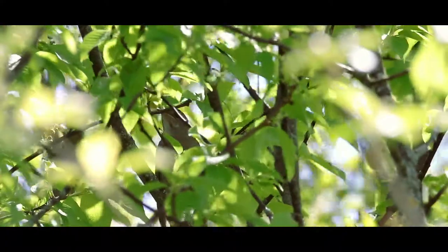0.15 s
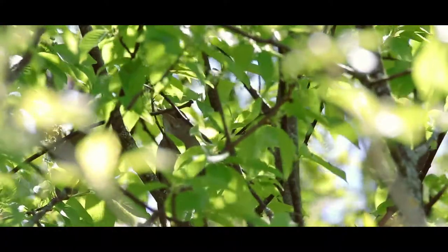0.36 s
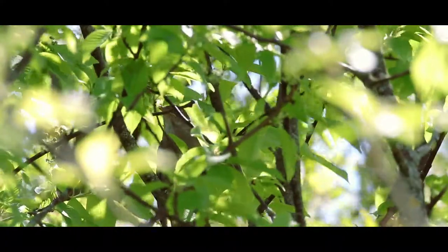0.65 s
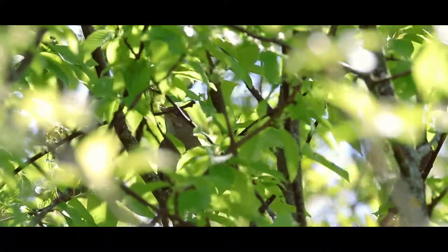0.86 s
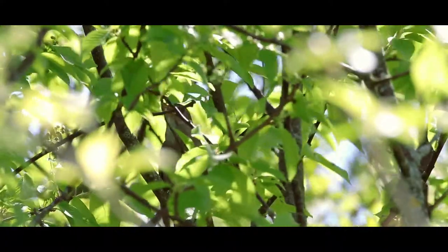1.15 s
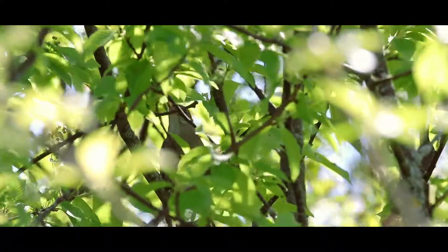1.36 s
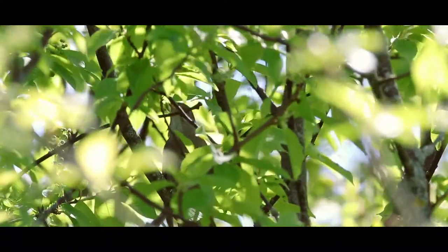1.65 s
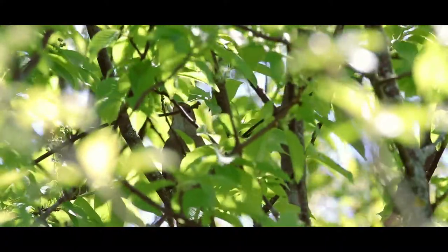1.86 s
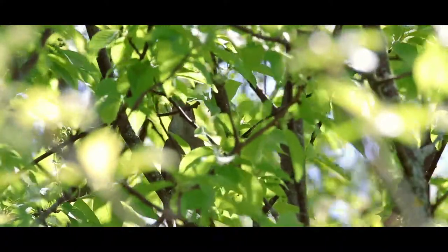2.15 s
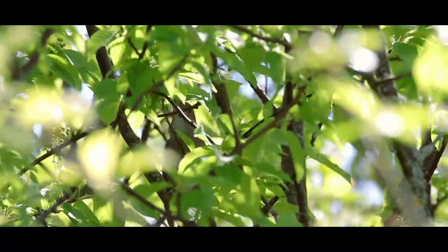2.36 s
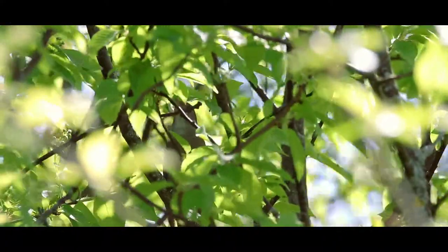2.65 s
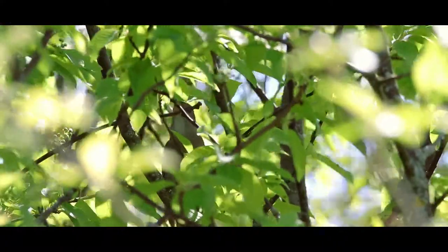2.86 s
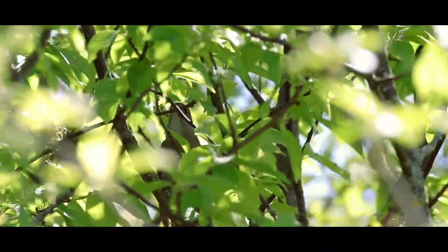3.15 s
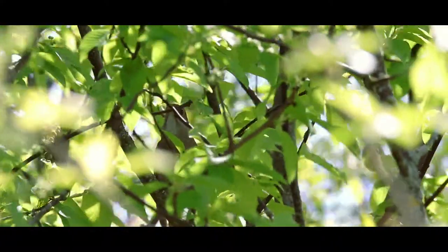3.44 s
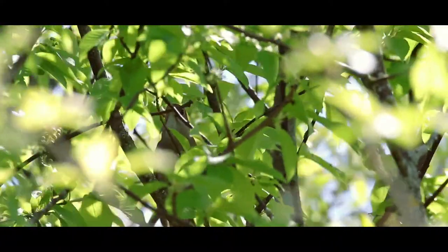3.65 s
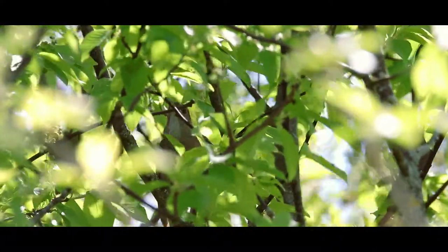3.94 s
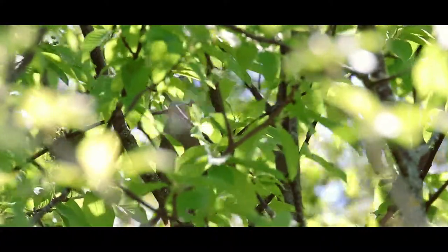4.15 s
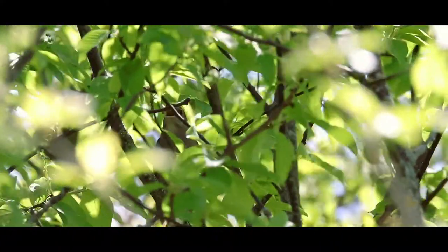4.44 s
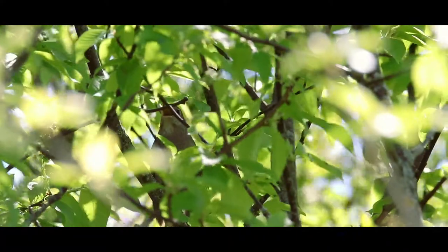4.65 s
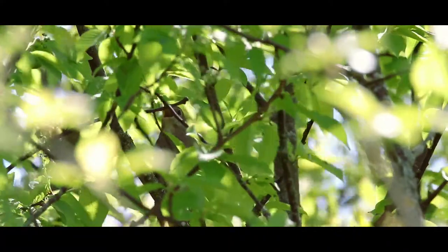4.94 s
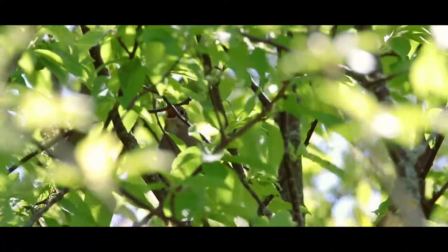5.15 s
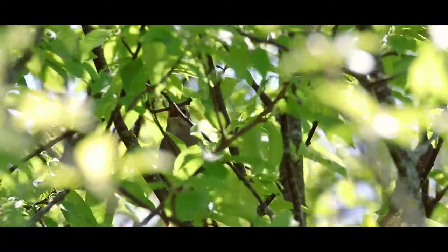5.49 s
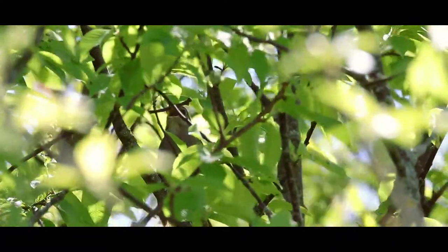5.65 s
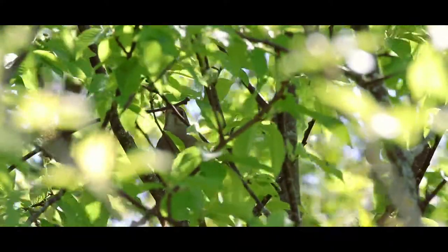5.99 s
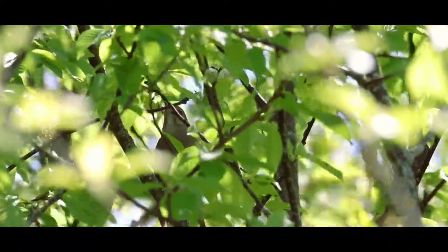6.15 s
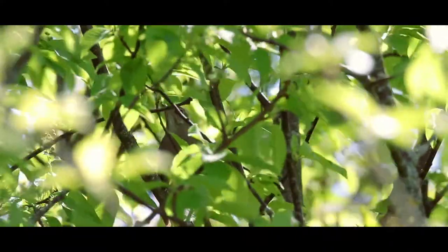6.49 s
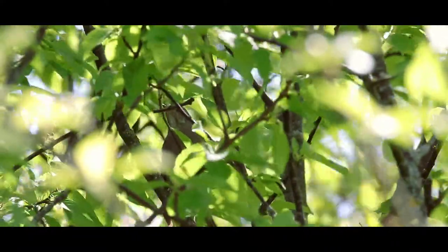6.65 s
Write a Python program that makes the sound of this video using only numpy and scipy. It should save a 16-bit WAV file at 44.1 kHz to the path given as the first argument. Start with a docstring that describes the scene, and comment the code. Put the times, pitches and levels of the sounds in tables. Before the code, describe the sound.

A thrush nightingale sings one phrase in a quiet wood: rising and falling whistles, eight loud chooks, a dry rattle and a thin tsee.

```python
"""In a wood, a thrush nightingale sings one phrase from inside a leafy tree: three whistle pairs,
a low slur, eight loud down-swept 'chooks', a rising rasp, a dry rattle, a thin 'tsee'.
Each note is a gliding syrinx tone; leaves and trunks scatter it.
Behind it: hushing air, breeze on the microphones, far leaves, a dying echo, a far bird."""
import sys
import numpy as np
from scipy import signal
from scipy.fft import rfft, irfft, next_fast_len
from scipy.io import wavfile
from scipy.ndimage import uniform_filter1d

SR = 44100
rng = np.random.default_rng(int(sys.argv[2]) if len(sys.argv) > 2 else 0)


def wav_out(sig):
    """Save sig, one row per channel (or a flat mono array), as 16-bit PCM at SR to the path in sys.argv[1]."""
    wavfile.write(sys.argv[1], SR, np.round(np.clip(np.atleast_2d(sig).T, -1, 1) * 32767).astype(np.int16))


N = 300762

# Outdoor hush: freq_hz, gain_db
AIR_SPECTRUM = [(15, -20), (30, -5.5), (55, 0), (150, -5), (330, -2.5), (450, -4.5), (650, -9), (1500, -14),
                (2300, -15), (3500, -20.5), (5200, -28), (7000, -25), (10500, -27), (15500, -34.5)]
# Left-right likeness of the hush: freq_hz, correlation (clipped to 0..0.98 in use)
AIR_CORRELATION = [(60, 0.64), (150, 0.78), (380, 0.68), (950, 0.24), (2380, -0.47), (5980, -0.00058),
                   (15000, 0.09)]
# Wind on a microphone: freq_hz, gain_db
WIND_SPECTRUM = [(15, -29), (25, -12), (40, 2.5), (60, -2), (120, -4.5), (200, -18.5), (400, -62),
                 (1500, -97)]
# Breeze puffs: centre_s, relative_db, sigma_s
WIND_PUFFS = [(2.19, -60.5, 0.0068), (3.7, -63.5, 0.1), (3.93, -51, 0.028), (4.13, -58.5, 0.05),
              (4.466, -49, 0.01), (4.52, -58, 0.033), (4.611, -47.5, 0.008)]
# Far leaves: freq_hz, gain_db
RUSTLE_SPECTRUM = [(400, -21.5), (800, -6), (1200, -2), (1650, 2.5), (2200, -1.5), (2800, -24), (4500, -35),
                   (8000, -39)]
# Far bird, arched chirps: start_s, top_hz, level_db
FAR_CHIRPS = [(.025, 4100, -74), (.33, 3850, -76), (1.25, 4900, -81), (3.329, 4180, -73), (3.5, 4430, -74),
              (4.019, 4200, -79), (5.889, 4700, -77)]
# Far bird, falling notes: start_s, from_hz, level_db
FAR_SLIDES = [(1.97, 4830, -79), (2.12, 4810, -76), (5.93, 4070, -78), (6.07, 5080, -74.5),
              (6.39, 4650, -71)]
# Foliage shading the left microphone: freq_hz, gain_db
FOLIAGE_SHADE = [(900, -1), (1400, -2.5), (2000, -4.5), (2500, -5.5), (4400, -2.5), (8000, -3), (14000, -1)]
# Echoes off near leaves: freq_hz, gain_db
LEAF_SPECTRUM = [(900, 7.5), (2300, 7), (4200, 6), (7000, 9.5), (10500, 20.5), (15000, 3)]
# Echoes off single trunks: delay_s, gain_db
TRUNK_ECHOES = [(.036, -39), (.073, -31.5), (.092, -36.5), (.141, -33)]
# Echoes off neighbouring trees: freq_hz, gain_db
TREE_SPECTRUM = [(900, -3.5), (1500, -0.5), (2300, -3), (4200, -0.5), (6800, 0), (10000, 8.5), (15000, -13)]
# Soft ticks between notes: centre_s, level_db, sigma_s
TICKS = [(.287, -65, 0.0065), (.995, -62, 0.0054), (1.574, -50, 0.0037), (6.33, -71, 0.009),
         (6.642, -67.5, 0.0074)]
# Tick noise: freq_hz, gain_db
TICK_SPECTRUM = [(1500, -17), (3300, 3.5), (4500, 0), (6500, -8.5), (8500, -20), (11000, -28), (15500, -28)]
# Colouring laid over the whole song, dip near 5.4 kHz, bright peak near 10 kHz: freq_hz, gain_db
SONG_COLOUR = [(900, -4), (3000, -2), (4300, 0.5), (5400, -4.5), (6600, -3), (7900, -2.5), (10300, 1),
               (12500, -10), (16000, -12)]
# Default syrinx overtones: harmonic, relative_db
OVERTONES = [(2, -41.5), (3, -43), (4, -54.5), (5, -48), (6, -40)]
# Throat resonance in the rasp: freq_hz, gain_db
THROAT_RESPONSE = [(1200, -11), (2200, -15), (3200, 0.5), (4200, -4), (5500, -1), (6800, 10), (9000, -6),
                   (10500, -18), (12000, -18), (16000, -23)]
# Rush of air in rasp and 'tsee': freq_hz, gain_db
BREATH_SPECTRUM = [(1500, -14), (3000, -8), (4300, -5), (7000, -3), (9800, -12), (11500, -18), (15500, -20)]
# Rattle tempo: time_s, clicks_per_s
RATTLE_TEMPO = [(4.82, 20.13), (4.87, 20.98), (5.35, 20.98), (5.39, 20.25)]
# Rattle effort: time_s, effort_db
RATTLE_EFFORT = [(4.42, -40.5), (4.48, -35.5), (4.67, -32.5), (4.77, -31), (5.01, -28), (5.12, -33.5),
                 (5.27, -27), (5.39, -31), (5.64, -32)]
# Closing 'tsee': start_s, length_s, from_hz, to_hz, level_db
TSEE_GLIDES = [(5.701, 0.019, 10000, 6900, -46), (5.7108, .034, 7160, 5770, -31.5),
               (5.734, .019, 5100, 3700, -51.5)]
# Whistle pairs: start_s, level_db, rise_from_hz, rise_to_hz, fall_from_hz, fall_to_hz
WHISTLE_PAIRS = [(0.5736, -32.5, 1867, 2155, 2610, 2064), (1.2069, -25.5, 1910, 2326, 2845, 2074),
                 (1.7629, -21, 1988, 2214, 2734, 1998)]
# Chooks: start_s, from_hz, level_db, hook_top_hz, hoot_top_hz
CHOOKS = [(2.4404, 2833, -19, 1733, 944), (2.679, 2900, -16.5, 1943, 987), (2.9237, 2860, -18, 1870, 910),
          (3.1568, 2820, -17, 1826, 1100), (3.3973, 2890, -15.5, 1913, 1100),
          (3.6397, 2760, -16, 1990, 1063), (3.8807, 2800, -16, 1814, 959), (4.127, 2935, -16, 1865, 1155)]
# Sizzle of the open beak: freq_hz, gain_db
SIZZLE_SPECTRUM = [(1500, -27), (3500, -3.5), (6000, -8.5), (9000, -9), (10200, -3), (11400, -11),
                   (12500, -2), (15500, -10)]


def from_db(db):
    """Decibels to gain."""
    return 10 ** (np.asarray(db) / 20)


def unit_rms(x):
    """Scale to rms 1."""
    return x / np.sqrt(np.mean(x ** 2) + 1e-20)


def on_bins(points, size):
    """A (freq_hz, value) table at FFT bins, interpolated in log frequency."""
    hz, value = np.transpose(points)
    return np.interp(np.log(np.fft.rfftfreq(size, 1 / SR) + 1e-3), np.log(hz), value)


def colour(x, spectrum):
    """Minimum-phase filter following a spectrum."""
    size = 2 * next_fast_len(x.shape[-1] // 2 + 4096, True)
    cepstrum = irfft(np.log(from_db(on_bins(spectrum, size))))
    cepstrum[1:size // 2] *= 2
    cepstrum[size // 2 + 1:] = 0
    return irfft(rfft(x, size) * np.exp(rfft(cepstrum)))[..., :x.shape[-1]]


def noise(spectrum):
    """Coloured noise, rms 1."""
    return unit_rms(colour(rng.standard_normal(N), spectrum))


def flutter(size, rate_hz):
    """Random wavering, spread about 1."""
    pole = np.exp(-2 * np.pi * rate_hz / SR)
    white = rng.standard_normal(size + SR // 10)
    return unit_rms(signal.lfilter([1], [1, -2 * pole, pole * pole], white))[-size:]


def add(track, start_s, sound):
    """Mix a sound into a track."""
    at = max(int(start_s * SR), 0)
    track[at:at + len(sound)] += sound[:max(N - at, 0)]


def delayed(x, delay_s):
    """Whole-sample delay."""
    return np.interp(np.arange(N) - np.round(delay_s * SR), np.arange(N), x, left=0)


def clock(length_s):
    """Seconds since note onset."""
    return np.arange(max(int(length_s * SR), 20)) / SR


def envelope(t, attack_s, release_s):
    """Sine attack, hold, sine-squared release."""
    attack = np.sin(np.pi / 2 * np.minimum(t / attack_s, 1))
    release = np.sin(np.pi / 2 * np.minimum((t[-1] - t) / release_s, 1)) ** 2
    return attack * release


def arch(t, crest_s, sigma_s):
    """Gaussian bell, height 1."""
    return np.exp(-.5 * ((t - crest_s) / sigma_s) ** 2)


def swells(rows):
    """Gain curve of summed bells."""
    t = np.arange(N) / SR
    return sum(from_db(db) * arch(t, centre_s, sigma_s) for centre_s, db, sigma_s in rows)


def glide(t, from_hz, to_hz):
    """Even slide in log pitch."""
    return from_hz * (to_hz / from_hz) ** (t / t[-1])


def flick(t, sharp_hz, decay_s=.0011):
    """Brief sharpness at the start of a downward note, in Hz."""
    return sharp_hz * np.exp(-t / decay_s)


def note(hz, jitter=.0058, jitter_hz=250, overtones=OVERTONES):
    """One side of the syrinx: a gliding, unsteady tone with overtones."""
    pitch_hz = hz * (1 + jitter * flutter(len(hz), jitter_hz))
    phase = 2 * np.pi * np.cumsum(pitch_hz) / SR
    upper = sum(from_db(db) * np.sin(k * phase) * (k * pitch_hz < SR / 2) for k, db in overtones)
    return np.sqrt(2) * (np.sin(phase) + upper)


def scatter(x, onset_s, t60_s, per_s, spectrum):
    """Random decaying echoes after a gap, different at each microphone."""
    t = np.arange(SR * 3 // 2) / SR
    echoes = rng.standard_normal((2, len(t))) * (rng.random((2, len(t))) < per_s / SR)
    echoes *= (t > onset_s) * from_db(-60 * t / t60_s)
    echoes /= np.sqrt(np.sum(echoes ** 2, axis=1, keepdims=True)) + 1e-12
    return colour(signal.fftconvolve(x[None], echoes, axes=1)[:, :N], spectrum)


def air():
    """Steady hush, more alike left and right in the bass."""
    correlation = np.clip(on_bins(AIR_CORRELATION, N), 0, .98)
    mid = rfft(noise(AIR_SPECTRUM))
    side = rfft(noise(AIR_SPECTRUM)) * np.sqrt((1 - correlation) / (1 + correlation))
    return from_db(-62) * irfft([mid + side, mid - side], N)


def breeze(buffet_db=1.5):
    """Turbulent puffs on each microphone."""
    buffeting = from_db(buffet_db * flutter(N, rate_hz=15))
    wind = np.array([noise(WIND_SPECTRUM), noise(WIND_SPECTRUM)])
    return from_db(5) * buffeting * swells(WIND_PUFFS) * wind


def far_leaves():
    """Smooth rustle off to the left; later and weaker on the right."""
    rustle = from_db(-61) * noise(RUSTLE_SPECTRUM)
    return np.array([rustle, from_db(-3) * delayed(rustle, .00022)])


def lingering_echo(fade_db_per_s=45):
    """An earlier whistle dying away among the trees, as narrow-band noise."""
    band = [(1700, -44), (2000, -27), (2140, 4), (2250, -8.5), (2500, -9), (2900, -58)]
    return from_db(-61.5 - fade_db_per_s * np.arange(N) / SR) * np.array([noise(band), noise(band)])


def far_bird():
    """Thin arched chirps and falling notes, heard only as scatter."""
    out = np.zeros(N)
    t = clock(.09)
    for start_s, top_hz, db in FAR_CHIRPS:
        hz = top_hz * (1 - .27 * (1 - arch(t, crest_s=.038, sigma_s=.043)))
        tone = note(hz, jitter=.0064)
        add(out, start_s, from_db(db) * tone * envelope(t, attack_s=.015, release_s=.03))
    t = clock(.115)
    for start_s, from_hz, db in FAR_SLIDES:
        tone = note(glide(t, from_hz, .88 * from_hz), jitter=.008)
        add(out, start_s, from_db(db) * tone * envelope(t, attack_s=.02, release_s=.064))
    return scatter(out, onset_s=.001, t60_s=.073, per_s=4200, spectrum=[(1000, 0), (8000, .0043)])


def woodland(song):
    """Direct path, shaded on the left, plus echoes off leaves, trunks, trees and the far wood."""
    shaded = irfft(rfft(song) * from_db(on_bins(FOLIAGE_SHADE, N)), N)
    direct = np.array([shaded, song])
    leaves = from_db(-15) * scatter(song, onset_s=.00067, t60_s=.064, per_s=3200, spectrum=LEAF_SPECTRUM)
    trunks = sum(from_db(db) * delayed(song, delay_s) for delay_s, db in TRUNK_ECHOES)
    trunks = colour(trunks, [(2500, -2.5), (7000, -8)])
    trees = from_db(-18) * scatter(song, onset_s=.023, t60_s=.46, per_s=1400, spectrum=TREE_SPECTRUM)
    far_spectrum = [(1000, 10.5), (2200, -3), (7000, -11), (14000, .5)]
    far = from_db(-24.5) * scatter(song, onset_s=.067, t60_s=.92, per_s=3000, spectrum=far_spectrum)
    return direct + leaves + trunks + trees + far


def ticks():
    """Soft noise ticks between notes."""
    return swells(TICKS) * noise(TICK_SPECTRUM)


def rasp(start_s=4.324, climb_s=.0625, from_hz=1400, to_hz=7910):
    """Rough squeak sweeping up through the throat resonance, in a rush of air."""
    out, t = np.zeros(N), clock(.083)
    period_s = np.interp(t, [0, climb_s], [1 / from_hz, 1 / to_hz])  # pitch climbs ever faster
    overtones = [(2, .5), (3, -5.5), (4, -7), (5, -11)]
    squeak = note(1 / period_s, jitter=.022, jitter_hz=900, overtones=overtones)
    add(out, start_s, from_db(-41) * squeak * envelope(t, attack_s=.053, release_s=.035))
    breath = swells([(4.362, -44.5, .017)]) * noise(BREATH_SPECTRUM)
    return colour(out, THROAT_RESPONSE) + breath


def click(effort_db, drift_hz):
    """Tiny rough downsweep in two voices; effort mostly strengthens the upper one."""
    stretch, spread_db, high_detune, low_detune = rng.standard_normal(4) * [.11, 1.1, .016, .04]
    t = clock(.0035 * np.exp(stretch))
    high_from_hz, high_to_hz, settle_s = 7520, 6610, .00047
    high_hz = high_to_hz + (high_from_hz - high_to_hz) * np.exp(-t / settle_s) + drift_hz
    high = note(high_hz * (1 + high_detune), jitter=.054, jitter_hz=1770, overtones=[(2, -27)])
    high *= from_db(effort_db - 5.5) * envelope(t, attack_s=.0021, release_s=.00023)
    low_hz = glide(t, from_hz=5400, to_hz=3400) + 2.5 * drift_hz
    low = note(low_hz * (1 + low_detune), jitter=.078, jitter_hz=1520, overtones=[(2, -6), (3, -9.5)])
    swing_db = effort_db - np.mean(RATTLE_EFFORT, axis=0)[1]
    low *= from_db(-44.5 + .5 * swing_db) * envelope(t, attack_s=.00048, release_s=.0023)
    return from_db(spread_db) * (high + low)


def rattle(start_s=4.4215, end_s=5.66, drift_hz_per_s=220):
    """About 20 clicks/s, creeping up in pitch, a little faster and louder midway."""
    out, at_s = np.zeros(N), start_s
    middle_s = (start_s + end_s) / 2
    while at_s < end_s:
        effort_db = np.interp(at_s, *np.transpose(RATTLE_EFFORT))
        add(out, at_s, click(effort_db, drift_hz_per_s * (at_s - middle_s)))
        at_s += 1 / np.interp(at_s, *np.transpose(RATTLE_TEMPO))
    return out


def tsee():
    """Thin overlapping down-glides and a breath end the phrase."""
    out = np.zeros(N)
    for start_s, length_s, from_hz, to_hz, db in TSEE_GLIDES:
        t = clock(length_s)
        tone = note(glide(t, from_hz, to_hz), jitter=.018, jitter_hz=800, overtones=[(2, -27)])
        add(out, start_s, from_db(db) * tone * envelope(t, attack_s=.013, release_s=.73 * length_s))
    return out + swells([(5.72, -61, .015)]) * noise(BREATH_SPECTRUM)


def whistles():
    """Pairs of a swelling rise and a fading fall, each pair louder."""
    climb_s, swell_db_per_s, full_voice_db = .0366, 148, -22.5
    fall_lag_s, settle_s, fade_db_per_s = .09, .016, 120
    out = np.zeros(N)
    for start_s, db, rise_from_hz, rise_to_hz, fall_from_hz, fall_to_hz in WHISTLE_PAIRS:
        # softer whistles are purer
        overtones = [(k, level_db + .5 * (db - full_voice_db)) for k, level_db in OVERTONES]
        t = clock(.048)
        hz = np.interp(t, [0, climb_s], [rise_from_hz, rise_to_hz])
        rise = note(hz, jitter=.007, overtones=overtones) * envelope(t, attack_s=.0062, release_s=.012)
        add(out, start_s, from_db(db + swell_db_per_s * (t - climb_s)) * rise)
        t = clock(.066)
        hz = fall_to_hz + (fall_from_hz - fall_to_hz) * np.exp(-t / settle_s) + flick(t, sharp_hz=480)
        fall = note(hz, overtones=overtones) * envelope(t, attack_s=.0073, release_s=.02)
        add(out, start_s + fall_lag_s, from_db(db + 3 - fade_db_per_s * t) * fall)
    return out


def creak(start_s=1.806):
    """Rough drop where the last rising whistle breaks off."""
    out, t = np.zeros(N), clock(.015)
    hz = glide(t, from_hz=2180, to_hz=1290)
    tone = note(hz, jitter=.06, jitter_hz=900, overtones=[(2, -6), (3, -19)])
    add(out, start_s, from_db(-56.5) * tone * envelope(t, attack_s=.0018, release_s=.007))
    return out


def slur(low_hz=992, top_hz=1480, swell_db=29.5):
    """Low hum lifting to one crest, loudest there."""
    t = clock(.1344)
    lift = arch(t, crest_s=.108, sigma_s=.021)
    tone = note(low_hz + (top_hz - low_hz) * lift, overtones=[(2, -34), (3, -46), (7, -41)])
    level_db = -32 - swell_db * (1 - lift ** .56)
    return from_db(level_db) * tone * envelope(t, attack_s=.004, release_s=.015)


def hoot(top_hz, arch_hz=130, db_per_octave=34):
    """Soft throaty arch after a chook, louder when higher."""
    t = clock(.034)
    tone = note(top_hz - arch_hz * (1 - arch(t, crest_s=.01, sigma_s=.0088)), jitter=.031)
    level_db = -48 + db_per_octave * np.log2(top_hz / 1078)
    return from_db(level_db) * tone * envelope(t, attack_s=.018, release_s=.022)


def hook(top_hz, foot_hz=1190, swell_db=6.5):
    """Rougher arch closing a chook."""
    t = clock(.045)
    lift = arch(t, crest_s=.0203, sigma_s=.0105)
    overtones = [(2, -33.5), (3, -47), (5, -48), (6, -39.5), (7, -41)]
    tone = note(foot_hz + (top_hz - foot_hz) * lift, jitter=.023, overtones=overtones)
    return from_db(swell_db * (lift - .5)) * tone * envelope(t, attack_s=.012, release_s=.011)


def dive(from_hz, to_hz=1276, sweep_s=.025):
    """Loud, steep downsweep opening a chook; fades after a short hold."""
    hold_s, fade_db_per_s, dip_db = .0057, 1394, 24.5
    t = clock(.035)
    hz = to_hz + (from_hz - to_hz) * np.maximum(1 - t / sweep_s, 0) ** 1.4 + flick(t, sharp_hz=332)
    tone = note(hz, jitter=.015, overtones=[(2, -40), (3, -42), (4, -62)])
    fade_db = np.clip(fade_db_per_s * (t - hold_s), 0, dip_db)
    return from_db(-fade_db) * tone * envelope(t, attack_s=.0049, release_s=.005)


def chooks(slur_start_s=2.14, hook_lag_s=.025, hoot_lag_s=.097):
    """A slur, then eight times dive, hook and hoot; the open beak adds a thin sizzle."""
    out = np.zeros(N)
    add(out, slur_start_s, slur())
    for start_s, from_hz, db, hook_hz, hoot_hz in CHOOKS:
        add(out, start_s, from_db(db) * dive(from_hz))
        add(out, start_s + hook_lag_s, from_db(db - 12.5) * hook(hook_hz))
        add(out, start_s + hoot_lag_s, hoot(hoot_hz))
    airflow = np.sqrt(uniform_filter1d(np.abs(out), size=130, origin=64).clip(0))
    return out + from_db(-50.5) * airflow * noise(SIZZLE_SPECTRUM)


def scene():
    """Singer in its tree over the background, stereo."""
    voice = whistles() + creak() + chooks() + rasp() + rattle() + tsee()
    song = colour(voice, SONG_COLOUR) + ticks()
    return far_bird() + woodland(song) + air() + breeze() + far_leaves() + lingering_echo()


def record(dry):
    """Steep elliptic low-pass."""
    cutoff_hz = 15800
    return signal.sosfilt(signal.ellip(10, .1, 70, cutoff_hz, fs=SR, output="sos"), dry)


dry = scene()
out = record(dry)
wav_out(out)
```